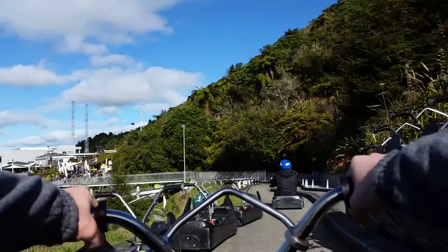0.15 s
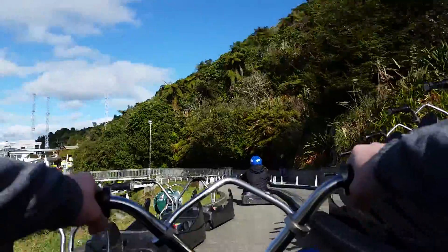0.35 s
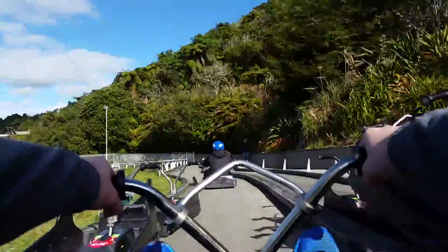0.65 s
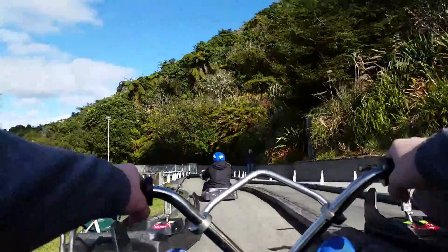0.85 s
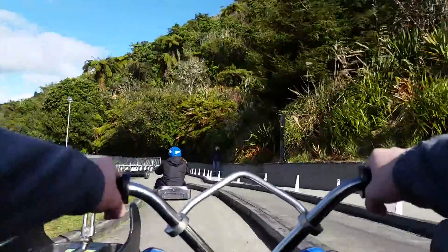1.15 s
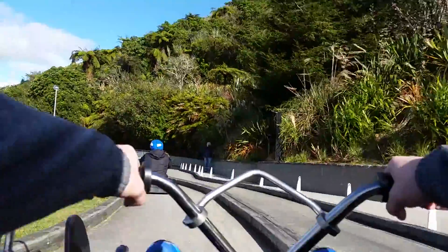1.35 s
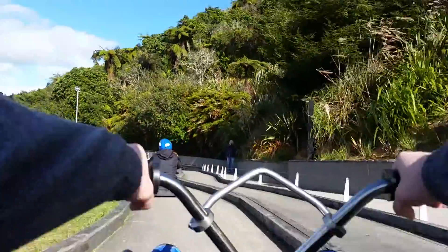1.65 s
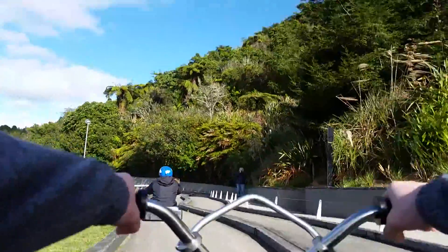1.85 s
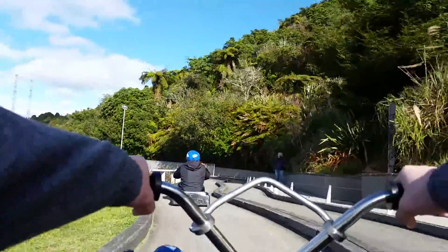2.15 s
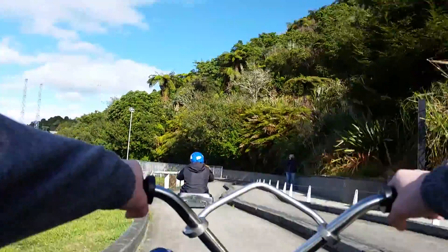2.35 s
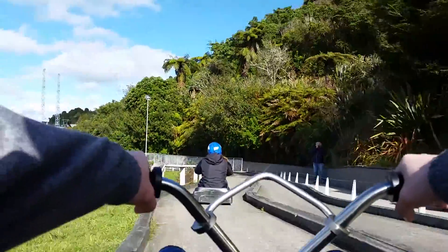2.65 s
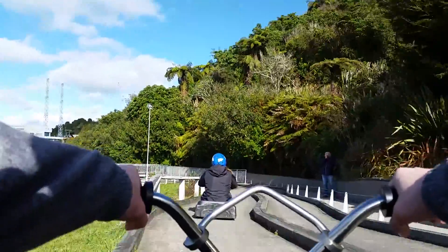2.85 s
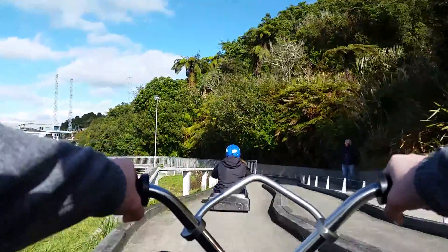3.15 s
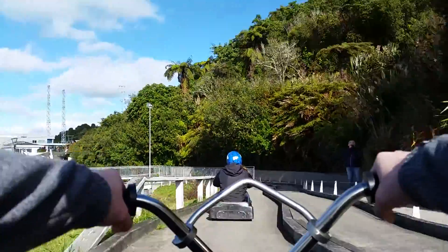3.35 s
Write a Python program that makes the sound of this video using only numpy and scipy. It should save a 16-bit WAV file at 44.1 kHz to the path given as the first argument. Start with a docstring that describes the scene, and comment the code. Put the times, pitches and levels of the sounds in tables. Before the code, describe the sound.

A small plastic cart rumbles steadily down a concrete track, knocking over bumps and crackling grit.

```python
"""On a concrete track outdoors, a small gravity cart rolls downhill, heard from the driver's seat.
Random stone impacts, filtered, make the roar and hiss of the hard wheels and ring the plastic tub's modes.
Bumps knock in dying trains of blows; grit crackles as noise bursts, loudest past parked carts on the left.
Filtered noise chirps twice, a panel resonance swells, and a tight joint creaks by stick-slip."""
import sys
import numpy as np
from scipy import signal
from scipy.fft import rfft, irfft
from scipy.io import wavfile
from scipy.ndimage import uniform_filter1d, minimum_filter1d

SR = 44100
rng = np.random.default_rng(int(sys.argv[2]) if len(sys.argv) > 2 else 0)


def wrap_up_sound(samples):
    """Save the sound to the file named by the first command line argument, as 16-bit audio."""
    columns = np.atleast_2d(samples).T
    # keep every value between -1 and 1, then stretch to whole-number steps
    tamed = np.clip(columns, -1, 1)
    steps = np.round(tamed * 32767).astype(np.int16)
    wavfile.write(sys.argv[1], SR, steps)


N = 154350  # samples, 3.5 s

STONES_PER_S = 600
STONE_SPREAD_DB = 1.5  # mean of the exponential spread, before its cap


def undb(db):
    """Amplitude ratio: 20 dB is a factor of ten."""
    return 10 ** (np.asarray(db) / 20)


def level(x, db):
    """Root-mean-square level: scale the signal to db relative to 1."""
    return x * undb(db) / np.sqrt(np.mean(x ** 2))


def curve(rows):
    """Linear interpolation: join (seconds, value) rows over the scene's time."""
    return np.interp(np.arange(N) / SR, *np.array(rows).T)


def spectrum(points):
    """Logarithmic pitch: join (hertz, dB) points by lines straight in log frequency."""
    hz, db = np.array(points).T
    grid_hz = np.fft.rfftfreq(2 * N, 1 / SR) + 1e-9
    return np.interp(np.log(grid_hz), np.log(hz), db)


def colour(x, points):
    """Minimum phase: folding the cepstrum makes a causal filter of the (hertz, dB) response."""
    cepstrum = irfft(np.log(undb(spectrum(points))))
    cepstrum[1:N] *= 2
    cepstrum[N + 1:] = 0
    response = np.exp(rfft(cepstrum))
    return irfft(rfft(x, 2 * N) * response)[..., :N]


def ring(x, hz, width_hz):
    """Resonance: two equal peak filters in series, each 2 * width_hz wide, give steep skirts."""
    b, a = signal.iirpeak(hz, hz / (2 * width_hz), fs=SR)
    return signal.lfilter(b, a, signal.lfilter(b, a, x))


def walk(rate):
    """Random modulation: straight lines join independent normal values, rate of them per second."""
    knots = rng.standard_normal(2000)
    return np.interp(np.arange(N) / SR * rate, np.arange(len(knots)), knots)


def impacts(per_s, spread_db):
    """Shot noise: randomly timed impacts, many weak and a few strong, at unit rms."""
    sizes = undb(spread_db * np.minimum(rng.exponential(size=N), 4))
    struck = rng.random(N) < per_s / SR
    return level(sizes * struck, 0)


def signs():
    """Random polarity: a push or a pull for every sample."""
    return np.sign(rng.standard_normal(N))


def crack(pulses, decay_s):
    """Energy decay: each pulse becomes a noise burst of the same mean energy, dying exponentially."""
    keep = np.exp(-2 / (decay_s * SR))
    energy = signal.lfilter([1 - keep], [1, -keep], pulses ** 2 + 1e-18)
    return np.sqrt(energy) * rng.standard_normal(N)


def tub(force_db):
    """Modal resonance: ceaseless impacts ring the tub's modes, whose balance shifts along the run."""
    # Resonances of the plastic tub. Each row: frequency in hertz, nominal width in hertz,
    # relative level in dB, trend in dB per second about the middle of the run.
    modes = [(157, 24.4, -1, 0.5), (185.1, 21.1, -2.5, 0.26), (225.8, 24, -9.5, 1.5), (307, 82, -22, 1),
             (339, 44, -14, 3), (425.2, 21, -14.5, -2.2), (580, 47, -21.5, 1), (776.4, 13, -30, 0.5),
             (927, 21, -34.5, 3)]
    follow = 0.093  # dB of boom per dB of rolling force
    push = impacts(2 * STONES_PER_S, 1) * signs()
    from_middle_s = (np.arange(N) - N / 2) / SR
    boom = np.zeros(N)
    for k, (hz, width_hz, db, trend) in enumerate(modes):
        mode = level(ring(push, hz, width_hz), db) * undb(trend * from_middle_s)
        boom += (-1) ** k * mode  # modes alternate in polarity
    return level(boom * undb(follow * force_db), -12.5)


def wheels(force_db):
    """Impact excitation: stones in the concrete strike the hard wheels into a low roar and gritty hiss."""
    # Broad roar, common to both sides and then different on each.
    # Each row: frequency in hertz, relative density in dB per hertz.
    roar_shape = [(20, -32), (50, 0.5), (70, 3), (95, -4), (130, 5), (260, 6.5), (330, -2.5), (450, -3.5),
                  (700, -13), (1000, -33.5), (1500, -51.5), (4000, -70)]
    swirl_shape = [(20, -6.5), (55, 2.5), (100, 6), (160, 3), (300, -3), (500, -3), (800, -5), (980, -12.5),
                   (1200, -22), (1500, -32.5), (2500, -37), (5000, -78)]
    # Hiss of the wheels at each side. Each row: frequency in hertz, relative density in dB per hertz.
    hiss_left = [(500, -13), (1200, 15), (2000, 7), (3200, -1.5), (4500, -6.5), (5400, -23.5), (9000, -35),
                 (12000, -35), (16000, -45)]
    hiss_right = [(500, -9), (1200, 11.5), (2000, -1), (3700, -9.5), (4700, -25), (7500, -42.5),
                  (9300, -35), (11300, -16), (13500, -34), (16000, -39.5)]
    # Overall hiss level. Entries: left in dB, right in dB.
    hiss_levels = [-45, -48]
    # Course of the scrubbing. Each row: time in seconds, relative level in dB.
    scrub_course = [(0, 3.5), (.09, -2.5), (.33, -2.5), (.42, 3), (.53, -1), (.65, 4.5), (.71, 1), (.8, -1),
                    (.95, 0), (.995, -6), (1.03, 4.5), (1.17, 1), (1.3, -1), (1.345, -5.5), (1.41, 0.5),
                    (1.52, -3), (1.72, -2), (1.94, -1), (2.01, 0.5), (2.22, -2), (2.32, 4), (2.38, -1.5),
                    (2.48, 1), (2.56, -3.5), (2.69, -1.5), (2.8, 1.5), (2.87, -6), (2.94, 6), (3.0, -3.5),
                    (3.17, 0.5), (3.25, -1.5), (3.5, 0.5)]

    force = undb(force_db + 0.36 * walk(45))  # slightly patchy force
    stones = impacts(STONES_PER_S, STONE_SPREAD_DB) * force
    roar = level(colour(stones * signs(), roar_shape), -19)
    swirl = np.array([level(colour(stones * signs(), swirl_shape), -26.5) for _ in range(2)])

    scrub = undb(curve(scrub_course) + 1.5 * walk(27))
    hiss = []
    for shape, db in zip((hiss_left, hiss_right), hiss_levels):
        source = 0.94 * stones * signs() + 0.51 * rng.standard_normal(N)  # stones and steady noise
        hiss.append(level(colour(scrub * source, shape), db))
    return roar + swirl, np.array(hiss)


def grit():
    """Transient noise: loose grains crackle under the wheels, and larger pebbles snap."""
    # Course of the crackling grains. Each row: time in seconds, gain in dB.
    course = [(0, -6), (.1, -14), (.32, -14), (.41, -5), (.5, -12.5), (.6, -13.5), (.65, -4.5), (.7, -14.5),
              (.8, 2), (.89, -9), (.945, -5), (.99, -15), (1.05, -6), (1.1, -8), (1.135, -12), (1.18, -8.5),
              (1.29, -11), (1.35, -15), (1.45, -13), (1.64, -16), (1.74, -12.5), (1.79, -19), (1.95, -23),
              (3.5, -16.5)]
    # Colour of grains and pebbles at each side. Each row: frequency in hertz, filter gain in dB
    # (relative for the grains, whose level is set afterwards).
    left_shape = [(700, -10.5), (2000, 9), (4800, 1.5), (7000, -7), (9000, -7.5), (12000, -12.5),
                  (15500, -22.5)]
    right_shape = [(700, -2), (2000, 12), (3800, -6), (5000, -12.5), (7800, -23.5), (9800, -5), (12000, -1),
                   (13300, -12.5), (15500, -25)]
    # Pebbles snapping under a wheel. Each row: time in seconds, relative strength in dB.
    pebbles = [(0.046, -6), (.15, 1.5), (.288, -4.5), (.413, -4), (0.621, -10), (.657, 2), (0.725, 8.5),
               (0.762, 10), (.80, 3), (.824, 12), (0.843, 7), (.875, 4.5), (.91, -7), (0.942, 5),
               (1.008, 5.5), (1.072, 9), (1.112, 5), (1.175, 6), (1.235, -6), (1.274, -6.5), (1.29, 3.5),
               (1.422, 4), (1.546, 0), (1.677, 0), (1.745, 1), (1.83, 3.5), (1.929, -6.5), (2.046, -13),
               (2.192, -1)]
    grain_levels_db, snap_gains_db = [-40, -46.5], [-23, -26]  # left, right; grains before their course

    grains = impacts(per_s=2700, spread_db=4) * undb(2.0 * walk(67))
    snaps = np.zeros(N)
    for start, db in pebbles:
        snaps[int(start * SR)] = undb(db)

    sides = []
    for shape, grain_db, snap_db in zip((left_shape, right_shape), grain_levels_db, snap_gains_db):
        crackle = level(colour(crack(grains, decay_s=0.0013), shape), grain_db) * undb(curve(course))
        snapping = undb(snap_db) * colour(crack(snaps, decay_s=0.0021), shape)
        sides.append(crackle + snapping)
    return np.array(sides)


def bumps():
    """Repeated impact: each bump sounds as a train of twelve quick blows, each 0.9 dB weaker than the one
    before."""
    # Bumps in the track. Each row: time in seconds, relative strength in dB.
    track = [(0.008, -1.5), (0.088, -8.5), (0.224, -1), (0.248, -7), (0.294, -12.5), (0.705, -12),
             (0.762, -4), (0.813, 0.5), (0.874, -7), (0.94, -1), (1.023, 4), (1.043, 2.5), (1.067, -0.5),
             (1.158, 3.5), (1.176, -7.5), (1.245, -3), (1.395, 4), (1.495, -1), (1.532, 1), (1.565, -1),
             (1.679, 2), (1.712, 4), (1.735, -1), (1.764, -7.5), (1.815, 1), (1.988, 4.5), (2.018, -8.5),
             (2.079, 1), (2.136, -1.5), (2.193, -2.5), (2.246, 0), (2.299, -4.5), (2.474, 4), (2.534, -2),
             (2.595, -3), (2.662, -1), (2.765, -6), (2.818, -3.5), (2.898, -5), (2.969, -3), (3.158, -0.5),
             (3.173, 0.5), (3.19, -5), (3.288, -5), (3.33, -2)]
    # Colour of a knock. Each row: frequency in hertz, relative density in dB per hertz.
    knock = [(40, -28), (150, -14), (320, 11.5), (450, 5.5), (750, -1), (1050, -15), (1600, -28.5),
             (3000, -37.5), (6000, -64)]
    rebound_s, rebound_scatter, rebound_db = .003, .5, -.9  # median gap, log spread, change per blow
    turn = np.arange(12)
    blows = np.zeros((3, N))  # common, left and right, independently timed
    for start, db in track:
        for part in blows:
            gaps = rebound_s * np.exp(rebound_scatter * rng.standard_normal(len(turn)))
            at = ((start + np.cumsum(gaps) - gaps[0]) * SR).astype(int)
            strengths = undb(db + rebound_db * turn)
            part[np.clip(at, 0, N - 1)] += strengths * rng.choice([-1, 1], len(turn))
    common, left, right = (level(colour(part, knock), -28) for part in blows)
    return common + 0.87 * np.array([left, right])


def squeaks():
    """Narrow-band noise: a wheel chirps thinly, twice, as it scrubs through the grit."""
    # Wheel chirps. Each row: peak time in seconds, length between the 1/e points in seconds,
    # frequency in hertz, level at the peak in dB.
    chirps = [(0.632, 0.018, 6560, -60), (1.058, .022, 9300, -57)]
    t = np.arange(N) / SR
    out = np.zeros(N)
    for peak, length, hz, db in chirps:
        tone = level(ring(rng.standard_normal(N), hz, width_hz=150), db)
        out += tone * np.exp(-(2 * (t - peak) / length) ** 2)
    return np.array([out, out])


def drone():
    """Forced resonance: one panel, shaken by impacts, swells and fades around the middle of the run."""
    peak_s, span_s = 1.85, 0.59  # span: from the peak to 1/e
    swell = np.exp(-((np.arange(N) / SR - peak_s) / span_s) ** 2)
    push = impacts(STONES_PER_S, STONE_SPREAD_DB) * signs()
    return level(ring(push, hz=305, width_hz=36), -24) * swell


def creaks():
    """Stick-slip friction: a joint gives uneven runs of bright ticks, and dry rubs that swell and fade."""
    # Runs of slips. Each row: start in seconds, length in seconds, relative tick strength in dB.
    runs = [(2.248, 0.018, 2), (2.432, 0.026, 0.5), (2.525, 0.013, 3), (2.745, .005, 0), (2.913, .005, -5),
            (2.943, 0.013, -3.5), (3.065, .005, 4), (3.147, .005, 2), (3.305, 0.019, 3.5),
            (3.402, .005, -2.5)]
    # Dry rubs of the joint. Each row: peak time in seconds, rise to the peak in seconds,
    # fall from it in seconds (both to 1/e), relative strength in dB.
    rubs = [(2.725, .01, 0.027, -6.5), (2.8, 0.046, 0.038, -1.5), (2.946, .025, .015, -12),
            (3.076, 0.024, 0.031, -4), (3.152, 0.058, 0.066, -2), (3.315, 0.017, 0.011, -6)]
    # Colour of the creaks at each side. Each row: frequency in hertz, relative filter gain in dB.
    left_shape = [(1000, -16.5), (3200, 9.5), (5000, -2), (7000, -7), (9500, -14), (11000, -12),
                  (12200, -1.5), (13600, -14), (14800, -7), (15700, -26.5)]
    right_shape = [(1000, -10.5), (3500, 1), (5000, -17), (8500, -23), (10500, -5), (12200, 2.5),
                   (13600, -21.5), (14800, -4.5), (15700, -30)]
    gains_db = [-21, -21.5]  # left, right
    slip_hz, slip_jitter, rub_db = 127, 0.22, -24.5

    t, slips, rub = np.arange(N) / SR, np.zeros(N), np.zeros(N)
    for start, length, db in runs:
        gap, size = rng.standard_normal((2, 20))
        ages = (np.arange(20) + slip_jitter * (gap - gap[0]) / 2) / slip_hz
        live = ages < length
        at = ((start + ages[live]) * SR).astype(int)
        slips[np.clip(at, 0, N - 1)] = undb(db + 2 * size[live])
    for peak, rise, fall, db in rubs:
        span = np.where(t < peak, rise, fall)
        rub += undb(rub_db + db) * np.exp(-((t - peak) / span) ** 2)
    grains = rub * impacts(per_s=1800, spread_db=5.0)

    return np.array([undb(db) * colour(crack(slips + grains, decay_s=0.0048), shape)
                     for shape, db in zip((left_shape, right_shape), gains_db)])


def shell(x):
    """Modal density: dense, quickly dying modes of the plastic body, as a noise tail, colour the treble."""
    ring_s, share = .012, .25
    t = np.arange(2048) / SR
    tail = rng.standard_normal(len(t)) * np.exp(-t / ring_s)
    ringing = signal.fftconvolve(x, tail / np.linalg.norm(tail))[:N]
    return (x + share * ringing) / np.hypot(1, share)


def scene():
    """Interaural difference: level and delay lean the low rumble right; hiss and grit lean left."""
    # Force of the rolling. Each row: time in seconds, relative force in dB.
    roll = [(0, -1), (.35, -6), (.68, -2), (.82, -1.5), (1.15, -2), (1.32, -1), (1.7, -2), (2.2, -3),
            (2.5, -0.5), (3.0, -2.5), (3.2, -3), (3.5, -6)]
    # Gain of the rumble's left side over its right. Each row: frequency in hertz, difference in dB.
    lean = [(60, -6), (160, -2), (300, -1), (500, -0.5), (700, 1.5), (1500, 3)]
    boom_lag_s = 0.00024  # the boom reaches the left ear later

    force_db = curve(roll)
    roar, hiss = wheels(force_db)
    t = np.arange(N) / SR
    boom = tub(force_db) + drone()
    boom_sides = np.array([np.interp(t - boom_lag_s, t, boom), boom])
    rumble = boom_sides + roar + bumps()
    lean_db = np.array([[1], [-1]]) * spectrum(lean) / 2  # half to each side
    leaning = irfft(rfft(rumble, 2 * N) * undb(lean_db))[:, :N]
    treble = np.array([shell(side) for side in hiss + grit() + creaks() + squeaks()])
    return leaning + treble


def record(dry):
    """Gain reduction: a limiter, linked across both sides, eases the strongest swells; the top is cut."""
    ceiling, top_hz = .96, 15800
    gain = np.minimum(1, ceiling / (np.abs(dry).max(axis=0) + 1e-9))
    gain = minimum_filter1d(gain, size=900)
    gain = uniform_filter1d(uniform_filter1d(gain, size=450), size=450)
    low_pass = signal.ellip(8, .2, 70, top_hz, fs=SR, output="sos")
    return signal.sosfilt(low_pass, dry * gain)


dry = scene()
out = record(dry)
wrap_up_sound(out)
```